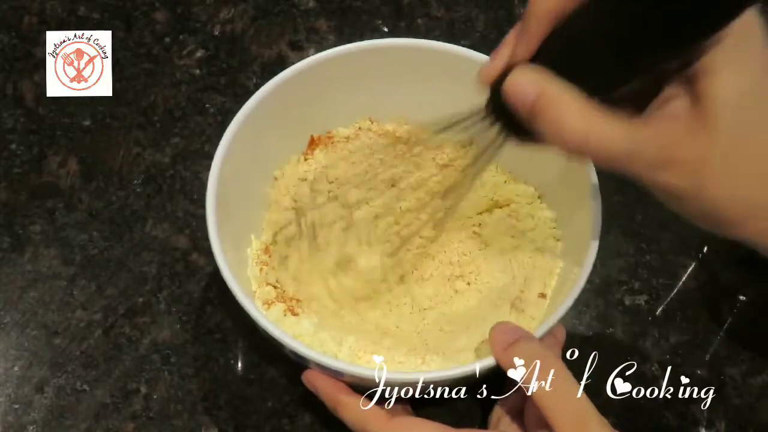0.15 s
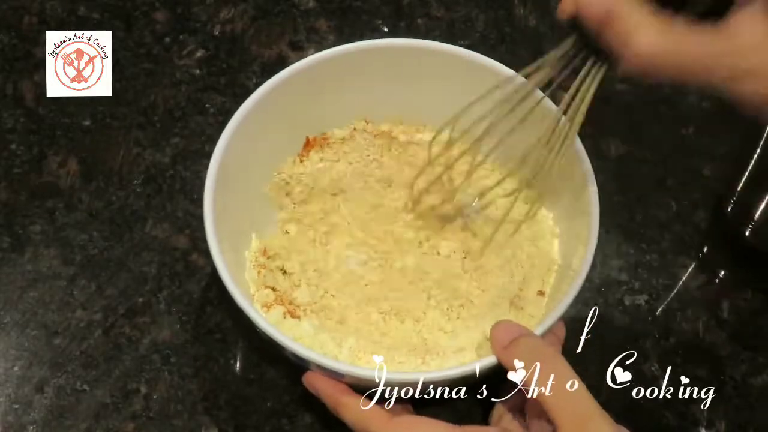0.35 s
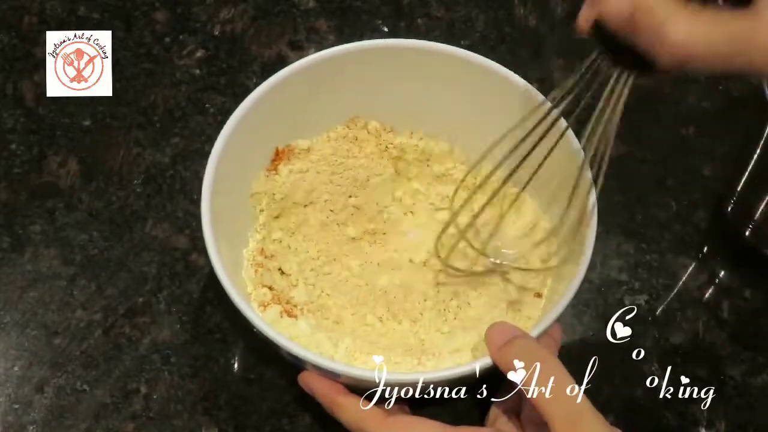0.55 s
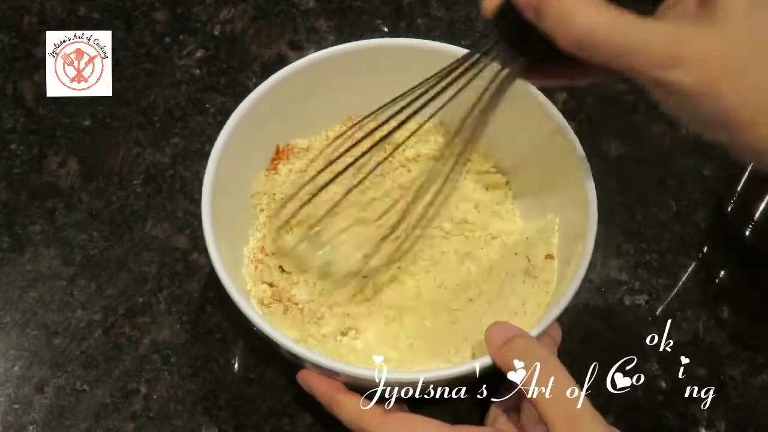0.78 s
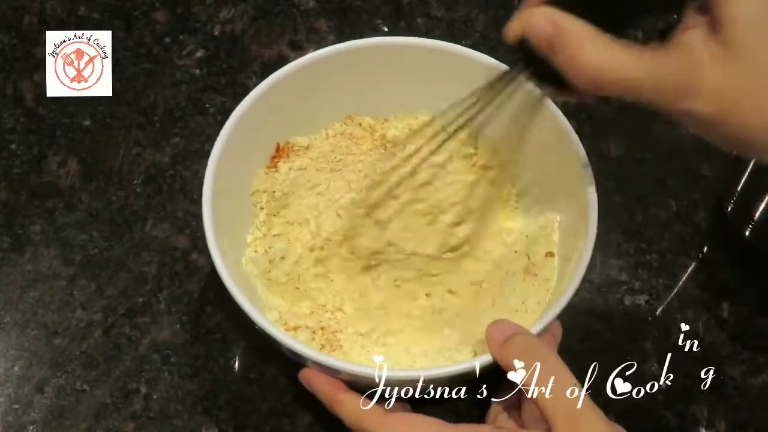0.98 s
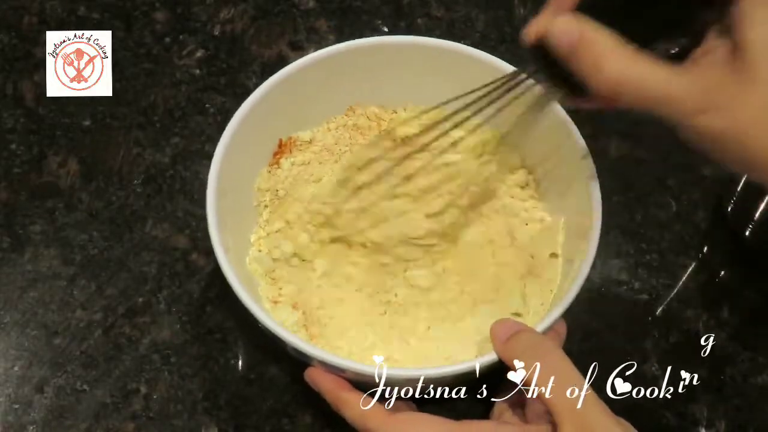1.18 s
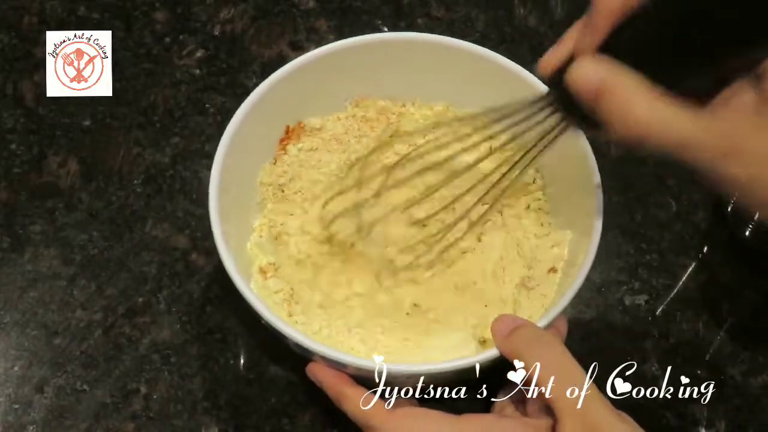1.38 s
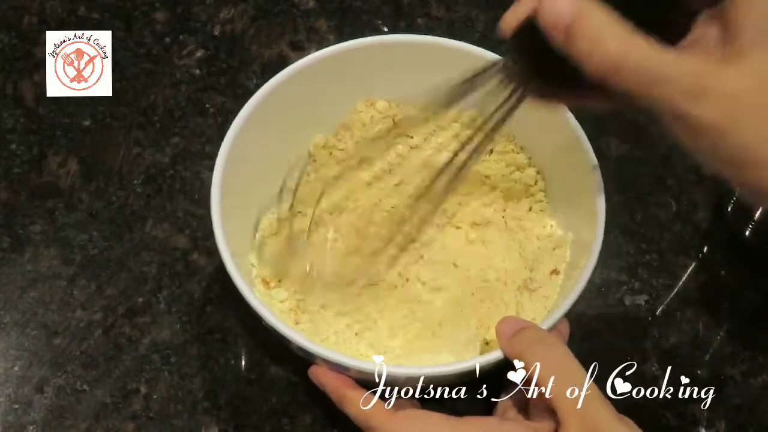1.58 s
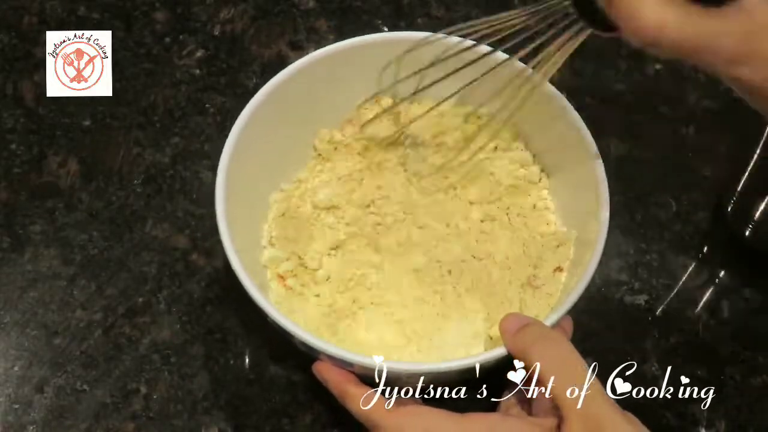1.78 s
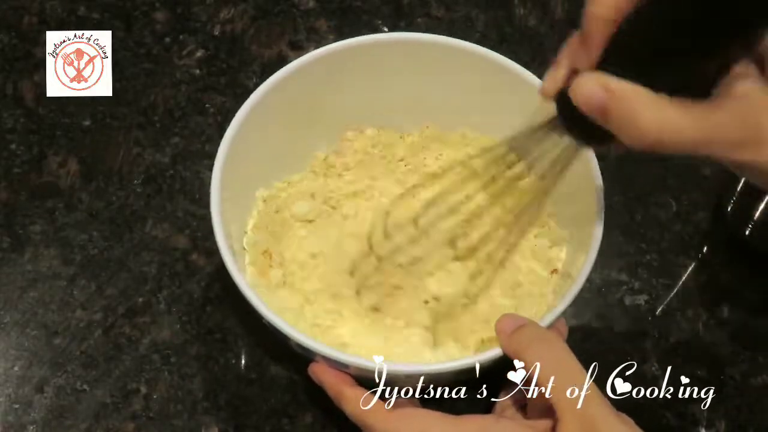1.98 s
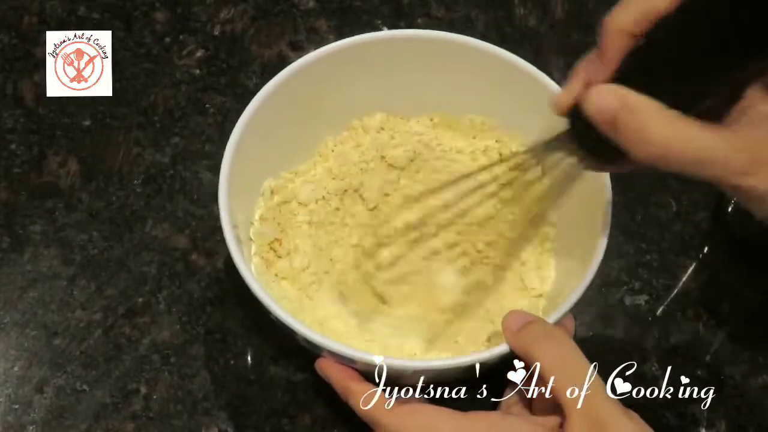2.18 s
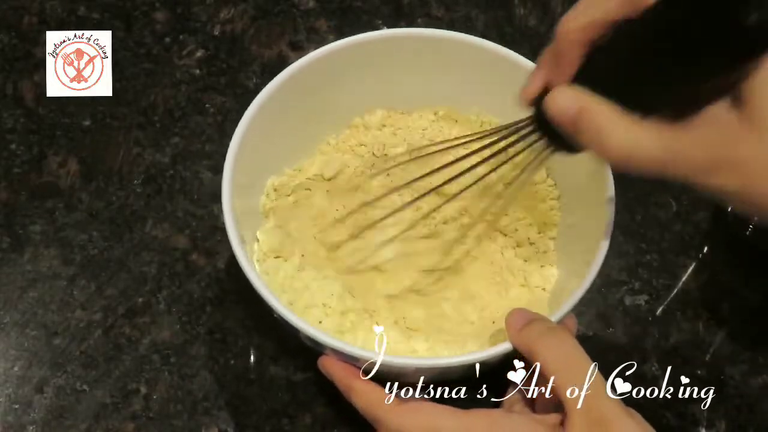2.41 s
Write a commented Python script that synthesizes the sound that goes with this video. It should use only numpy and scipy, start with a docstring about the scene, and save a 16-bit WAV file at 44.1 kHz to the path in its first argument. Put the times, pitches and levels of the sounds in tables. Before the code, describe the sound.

A wire whisk stirs dry flour in a ceramic bowl, heard close in a quiet, lightly echoing kitchen. Room hum and a loud knock at 0.2 s come first; at 0.43 s the level drops abruptly. Then uneven taps and low thumps follow near 0.55, 0.9 and 1.45 s, brief gritty drags between, with bright wire clinks at 1.62, 1.96 and strongest around 2.1 s, ending in short scrapes.

```python
"""Whisk in a bowl of flour

A wire whisk stirs dry flour in a ceramic bowl on a kitchen counter, near one microphone; a quiet room hums.
Blows ring decaying bowl modes and thump the counter; ticks and clinks are noise cracks through wire resonances.
Drags and skids are grains and dust through wires and bowl. The kitchen answers with decaying noise tails.
The level is high at first and is then turned down abruptly."""
import sys
import numpy as np
from scipy import signal
from scipy.fft import rfft, irfft, next_fast_len
from scipy.io import wavfile
from scipy.ndimage import map_coordinates

SR = 44100
rng = np.random.default_rng(int(sys.argv[2]) if len(sys.argv) > 2 else 0)


def dump(signal):
    """Clip the signal to [-1, 1] and save it as 16-bit WAV at the path in sys.argv[1]."""
    limited = np.clip(np.atleast_2d(signal).T, -1, 1)
    pcm = np.round(limited * 32767).astype(np.int16)
    wavfile.write(sys.argv[1], SR, pcm)


def linear_from_db(decibels):
    """Turn decibels (scalar or array-like) into linear amplitude factors; 0 gives 1."""
    return 10 ** (np.asarray(decibels, float) / 20)


N = 108045

# bowl modes: (frequency [Hz], level [dB], t60 at ring factor 1 [s])
BOWL_MODES = [(290.7, -10.5, 0.16), (416.6, -2.5, 0.12), (530.7, -4.5, 0.11), (590, -6.5, 0.086),
              (750, -4, 0.064), (915.5, -10, .08), (978.4, -3, 0.0344), (1045.4, 1.2, 0.053),
              (1085, -17.5, 0.45), (1100, -3, 0.042), (1157, 0.5, 0.047), (1249, -8.5, 0.058),
              (1430, -4, 0.044), (1611, -6.5, .04), (1881, -3, 0.06), (1950, -4.5, 0.0461),
              (2093, -3, 0.034), (2448, -5.5, 0.057), (2640, -5, 0.033), (3210, -17.5, 0.028),
              (3810, -5.5, 0.025)]
# wire resonances: (frequency [Hz], width [Hz], level when free [dB], level when touching the bowl [dB])
WIRE_MODES = [(3218, 49, -11, -6), (4094, 250, -12, -1), (4530, 44, 1, -11.5), (5090, 60, -2, -13.5),
              (5710, 165, 1.5, 1), (6940, 560, -1.5, -3), (7840, 240, -1.5, -6.5), (8620, 350, 1.5, -4),
              (9980, 285, -9.5, -3.5), (10804, 300, 1.5, -2.5), (12115, 490, 2, 0), (13300, 660, -9, -3),
              (14240, 680, -14, -9.5)]


def unit(x):
    """Scaled to rms 1."""
    return x / np.sqrt(np.mean(x ** 2) + 1e-20)


def along(points, hz):
    """Interpolates (Hz, value) points on a log frequency axis."""
    f, v = np.transpose(points)
    return np.interp(np.log(hz + 1), np.log(f + 1), v)


def filtered(x, response):
    """x times a complex response of frequency."""
    m = next_fast_len(x.shape[-1] + 2048)
    spectrum = rfft(x, m) * response(np.fft.rfftfreq(m, 1 / SR))
    return irfft(spectrum, m)[..., :x.shape[-1]]


def add_at(out, start_s, sound):
    """Adds a sound into out from start_s."""
    out[round(start_s * SR):][:len(sound)] += sound


def high_pass(f, corner_hz, order):
    """Cascade of first-order high-passes."""
    return (1j * f / (corner_hz + 1j * f)) ** order


def resonances(f, peaks):
    """Causal sum of (Hz, width Hz, dB) resonances with alternating sign."""
    total = 0
    for k, (hz, width_hz, db) in enumerate(peaks):
        total = total + (-1) ** k * linear_from_db(db) * 1j * f * width_hz / (hz * hz - f * f + 1j * f * width_hz)
    return total


def wire(f, tilt_db_per_octave, chance, touching):
    """Whisk response: resonances of varied level over a weak flat floor, high-passed and tilted."""
    vary_db, flat_db, low_hz = 2.2, -12.5, 2235
    peaks = [(hz, width_hz, db[touching] + vary_db * c)
             for (hz, width_hz, *db), c in zip(WIRE_MODES, chance)]
    tilt = linear_from_db(tilt_db_per_octave * np.log2((f + 2000) / 8000))
    return (resonances(f, peaks) + linear_from_db(flat_db)) * high_pass(f, low_hz, 3) * tilt


def region_db(hz, centre_hz, octaves):
    """Weight of a bowl mode by its distance from the favoured pitch."""
    return -6 * (np.log2(hz / centre_hz) / octaves) ** 2


def room_tone():
    """Steady kitchen air and microphone hiss: shaped noise."""
    # (frequency [Hz], relative density [dB])
    hum_spectrum = [(20, -19), (40, -14), (60, -3.5), (82, -15), (125, -3), (200, -9), (290, -2),
                    (420, -11.5), (640, -14), (1500, -21.5), (2300, -23.5), (5800, -32.5), (12000, -44),
                    (16000, -46.5)]
    level_db = -71
    noise = filtered(rng.standard_normal(N), lambda f: linear_from_db(along(hum_spectrum, f)))
    return linear_from_db(level_db) * unit(noise)


def kitchen(x):
    """Room answer: each frequency of a noise tail dies at its own speed; a new tail every 0.2 s."""
    # (frequency [Hz], t60 [s])
    decay = [(100, 0.27), (500, 0.99), (1100, 0.28), (3000, 0.19), (6000, 0.36), (15000, 0.28)]
    level_db, treble_db, build_s = -8.5, -6.5, 0.012
    out, step = np.zeros(N + SR), SR // 5
    for start in range(0, N, step):
        hz, t, z = signal.stft(rng.standard_normal(SR * 3 // 4), SR, nperseg=256)
        fade = linear_from_db(-60 * t / along(decay, hz)[:, None])
        build = np.minimum(t / build_s, 1)
        tail = signal.istft(z * fade * build, SR, nperseg=256)[1]
        colour_db = treble_db * np.log2(1 + hz / 2000)
        tail = filtered(tail / np.linalg.norm(tail), lambda f: linear_from_db(np.interp(f, hz, colour_db)))
        wet = signal.fftconvolve(x[start:start + step], tail)
        out[start + 180:][:len(wet)] += wet  # about 4 ms late
    return linear_from_db(level_db) * out[:N]


def grit(size):
    """Dense flour grains of uneven size over fine dust, juddering as the wires stick and slip."""
    grains_per_s, spread_db, dust_db = 2500, 8, -3
    judder_db, judder_s = 2.5, 0.0044
    hits = rng.random(size) < grains_per_s / SR
    sizes = linear_from_db(spread_db * rng.uniform(-1, 1, size))
    grains = hits * sizes * np.sign(rng.standard_normal(size))
    judder = map_coordinates(rng.standard_normal(size // 40), [np.arange(size) / SR / judder_s])
    return linear_from_db(judder_db * judder) * (unit(grains) + linear_from_db(dust_db) * rng.standard_normal(size))


def strokes(rows, rise_power, fall_power):
    """Grit under each stroke excites the wires and rubs the bowl."""
    rub_hz, rub_octaves = 2100, 0.65
    out, t = np.zeros(N + SR), np.arange(SR // 6) / SR
    rub_modes = [(hz, 3 / t60, db + region_db(hz, rub_hz, rub_octaves)) for hz, db, t60 in BOWL_MODES]
    for start_s, length_s, hiss_db, rub_db, tilt_db in rows:
        chance = rng.standard_normal(len(WIRE_MODES))
        u = np.clip(t / length_s, 0, 1)
        shape = u ** rise_power * (1 - u) ** fall_power
        shape = shape / shape.max()
        wires = lambda f: wire(f, tilt_db, chance, True)
        bowl = lambda f: resonances(f, rub_modes)
        for db, body in ((hiss_db, wires), (rub_db, bowl)):
            grains = grit(len(t))
            stroke = filtered(shape * grains, body) / filtered(grains, body).std()
            add_at(out, start_s, linear_from_db(db) * stroke)
    return out[:N]


def drags():
    """Strokes through the flour that swell and stop short."""
    # (start [s], length [s], wire hiss level [dB], bowl rub level [dB], hiss tilt [dB/octave])
    drag_rows = [(0.137, 0.13, -82.5, -90, -4), (0.262, 0.056, -73, -67.5, -9),
                 (0.3, 0.04, -69.5, -70.5, -6), (0.439, 0.052, -81, -90, 1), (0.902, 0.063, -76, -81, -2.5),
                 (1.11, 0.047, -69, -69.5, 1), (1.19, 0.038, -69, -68.5, 1),
                 (1.25, 0.032, -75.5, -72.5, -5), (1.291, 0.057, -83, -81.5, 10.5),
                 (1.352, 0.027, -76.5, -67.5, -6), (1.385, 0.042, -84.5, -76.5, -2),
                 (1.462, 0.027, -72, -67.5, 1), (1.513, 0.039, -77.5, -72, 1), (1.68, 0.0092, -67, -71, 5),
                 (1.768, 0.024, -86, -97, -6.5), (1.862, 0.033, -76, -95.5, -1),
                 (1.998, 0.036, -79, -97, -8), (2.225, 0.063, -68, -73.5, 4), (2.318, 0.02, -70, -67, 3),
                 (2.37, 0.029, -74, -65.5, 0), (2.415, 0.037, -73, -70, 1.5)]
    return strokes(drag_rows, rise_power=0.89, fall_power=0.55)


def skids():
    """Strokes that start hard and fade."""
    # (start [s], length [s], wire hiss level [dB], bowl rub level [dB], hiss tilt [dB/octave])
    skid_rows = [(0.226, 0.21, -78.5, -80, -6), (.565, .03, -77, -72, -6), (0.657, 0.089, -66.5, -70.5, -6),
                 (1.09, 0.066, -80, -70.5, -2), (1.153, 0.045, -72.5, -64, -8),
                 (1.232, 0.044, -70, -66.5, -6), (1.971, 0.046, -67, -76, -11.5),
                 (2.13, 0.11, -68, -83, -11), (2.359, 0.05, -68.5, -67, 4.5), (2.408, 0.023, -86, -64, 0)]
    return strokes(skid_rows, rise_power=0.2, fall_power=3.3)


def cracks(rows, touching):
    """Short decaying noise bursts through the wire resonances."""
    out, t = np.zeros(N + SR), np.arange(SR // 10) / SR
    for start_s, db, t60_s, tilt_db in rows:
        chance = rng.standard_normal(len(WIRE_MODES))
        noise = rng.standard_normal(len(t))
        crack = noise * linear_from_db(-60 * t / t60_s) * (1 - np.exp(-t / 0.0007))
        tick = filtered(crack, lambda f: wire(f, tilt_db, chance, touching))
        onset_rms = np.sqrt(np.mean(tick[:176] ** 2))  # first 4 ms
        add_at(out, start_s, linear_from_db(db - 12.5) * tick / onset_rms)
    return out[:N]


def clinks():
    """Free wires clink against each other."""
    # (time [s], level [dB], crack t60 [s], tilt [dB/octave])
    clink_rows = [(.649, -46, 0.054, -5.5), (0.654, -38, 0.019, -4), (.682, -49, 0.014, -7),
                  (1.62, -29.5, 0.0052, 2), (1.6261, -35, 0.006, -2), (1.6294, -43, 0.003, -9),
                  (1.96, -47.5, 0.029, -16), (1.964, -41.5, 0.014, 5), (1.968, -36, 0.014, 2),
                  (2.1185, -29.5, 0.0158, -2)]
    return cracks(clink_rows, touching=False)


def ticks():
    """Wire tips tick on the bowl."""
    # (time [s], level [dB], crack t60 [s], tilt [dB/octave])
    tick_rows = [(0.2095, -61, 0.014, -8), (0.218, -55, 0.034, -19.5), (0.546, -49.5, 0.0085, -12),
                 (.553, -45.5, 0.015, -16), (.558, -44.5, 0.015, -3.2), (0.562, -55.5, 0.018, 2),
                 (1.039, -68, .02, 5.5), (1.043, -57, 0.031, -8), (1.091, -72, .012, -11),
                 (1.176, -63, .006, -10.5), (1.35, -54.5, 0.0064, -15), (1.454, -45.5, 0.024, -21.5),
                 (1.5, -61, 0.021, -2), (1.666, -46, 0.016, -20), (2.1045, -35, 0.054, -4),
                 (2.112, -30.5, 0.027, 1), (2.122, -39.5, 0.026, -6.5), (2.382, -64, 0.0048, 6),
                 (2.396, -64.5, 0.0057, -5)]
    return cracks(tick_rows, touching=True)


def thumps():
    """Dull thumps of the bowl against the counter: each a soft, quickly damped low swing."""
    # (time [s], level [dB], frequency [Hz])
    thump_rows = [(0.222, -56.5, 179), (0.234, -59.5, 105), (0.552, -52, 105), (0.685, -53.5, 128),
                  (0.916, -52.5, 251), (0.925, -56.5, 113.7), (1.044, -51.5, 257), (1.40, -53.5, 318)]
    t60_cycles = 10.8
    out, t = np.zeros(N + SR), np.arange(SR // 3) / SR
    for start_s, db, hz in thump_rows:
        cycles = t * hz
        swing = np.sin(2 * np.pi * cycles) * np.minimum(2 * cycles, 1)
        add_at(out, start_s, linear_from_db(db - 60 * cycles / t60_cycles) * swing)
    return out[:N]


def taps():
    """Each blow rings the bowl modes nearest to the pitch favoured by the spot."""
    # (time [s], level [dB], favoured pitch [Hz], breadth [octaves], ring length [factor])
    blow_rows = [(0.2096, -43, 1076, 0.45, 0.74), (0.2184, -50, 2190, 0.31, 0.53),
                 (0.2202, -35.5, 1065, 0.25, 0.72), (0.2204, -44, 640, 0.5, 0.75),
                 (0.2295, -59, 1100, 0.73, 1.8), (.241, -54, 1110, 0.6, 1), (0.262, -54, 1090, 0.37, 2.3),
                 (0.319, -60.5, 1020, 0.51, 1.24), (.34, -57, 970, 0.51, 1.2),
                 (.362, -59.5, 1110, 0.22, 1.3), (.405, -64, 1080, 0.21, 2), (.461, -65, 1100, 0.19, 1.6),
                 (.547, -46.5, 590, 0.1, 0.64), (0.547, -46.5, 1940, 0.61, 1.1),
                 (0.552, -52, 1204, 0.22, 1.17), (.558, -42, 2090, 0.15, 0.55),
                 (0.559, -48, 1430, 0.099, 0.97), (.652, -48.5, 1075, 0.58, 0.81),
                 (0.681, -46.5, 800, 1.6, 0.49), (0.682, -50.5, 2100, 0.064, 0.42),
                 (0.907, -44.5, 1164, 0.34, 0.61), (0.905, -64.5, 1640, 0.073, 0.39),
                 (0.919, -48, 800, 0.74, 0.55), (1.038, -50.5, 1090, 0.61, 0.92),
                 (1.04, -57, 595, 0.12, 0.78), (1.044, -52.5, 940, 1.16, 0.46),
                 (1.091, -49.5, 2000, 0.45, 0.29), (1.092, -71, 1085, 0.0088, 2.7),
                 (1.217, -56, 1515, 0.23, 0.49), (1.237, -59.5, 2580, 0.19, 0.83),
                 (1.349, -49.5, 1950, 0.396, 0.6), (1.3491, -50.5, 1085, 0.12, 0.85),
                 (1.454, -39, 1950, 0.93, 0.58), (1.454, -38, 1005, 0.068, 0.64),
                 (1.501, -40, 1880, 0.31, 0.38), (1.62, -48.5, 1919, 1.3, 0.64),
                 (1.666, -40, 1087, 0.23, 0.61), (1.666, -48, 646, 0.23, 0.42),
                 (1.667, -48.5, 2720, 0.11, 0.43), (1.796, -55.5, 1050, 0.58, 0.53),
                 (1.867, -59, 777, 0.33, 0.62), (1.962, -57, 1100, 0.083, 1.95),
                 (1.965, -55, 1783, 0.172, 0.49), (1.965, -58, 760, .15, 0.7),
                 (2.104, -55, 1694, 0.17, 0.7), (2.113, -42, 900, 0.14, 0.45),
                 (2.115, -50, 1570, 0.253, 0.95), (2.114, -53, 547.8, 0.2, 0.29),
                 (2.231, -60, 1130, 0.11, 1.47), (2.364, -55, 1830, 0.52, 0.595),
                 (2.389, -45, 2100, 0.88, 0.24), (2.409, -46.5, 1940, 0.72, 0.16)]
    vary_db, detune_ratio, attack_s = 1.2, 0.0035, 0.00012
    out, t = np.zeros(N + SR), np.arange(SR // 3) / SR
    hz, mode_db, t60_s = np.transpose(BOWL_MODES)[:, :, None]
    sign = (-1.) ** np.arange(len(BOWL_MODES))[:, None]
    for start_s, db, centre_hz, octaves, ring_factor in blow_rows:
        size, detune = rng.standard_normal((2, len(BOWL_MODES), 1))
        gain = sign * linear_from_db(mode_db + region_db(hz, centre_hz, octaves) + vary_db * size)
        decay = linear_from_db(-60 * t / (t60_s * ring_factor))
        modes = decay * np.sin(2 * np.pi * hz * (1 + detune_ratio * detune) * t)
        ring = (gain * modes).sum(axis=0) * (1 - np.exp(-t / attack_s))
        add_at(out, start_s, linear_from_db(db) * ring / np.linalg.norm(gain))
    return out[:N]


def scene():
    """Whisk and bowl in the room."""
    # the blows carry little sound below 73 Hz
    blows = filtered(taps() + thumps(), lambda f: high_pass(f, 73, 2))
    whisk = blows + ticks() + clinks() + drags() + skids()
    return (whisk + kitchen(whisk) + room_tone())[None]


def low_pass(x):
    """Removes everything above the highest recorded frequency."""
    return signal.sosfilt(signal.butter(12, 16430, fs=SR, output="sos"), x)


def record(dry):
    """The level is turned down once; the top treble rolls off to a band limit."""
    turn_down_s, turn_down_length_s, turn_down_db = 0.4322, 0.0018, 25
    roll_hz, top_hz, roll_db = 14600, 16400, -21.5
    t = np.arange(N) / SR
    early = 1 - np.clip((t - turn_down_s) / turn_down_length_s + 0.5, 0, 1)
    mic = lambda f: linear_from_db(np.interp(f, [roll_hz, top_hz], [0, roll_db])) * (f < top_hz)
    mix = filtered(dry * linear_from_db(turn_down_db * early), mic)
    return low_pass(mix)


dry = scene()
out = record(dry)
dump(out)
```